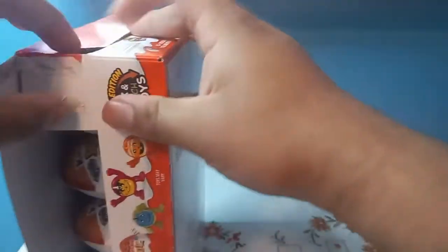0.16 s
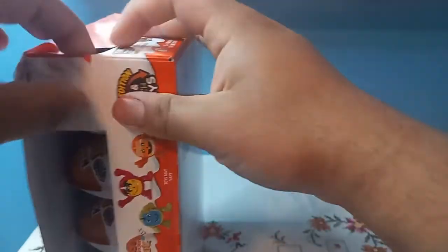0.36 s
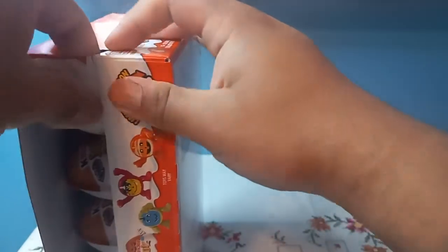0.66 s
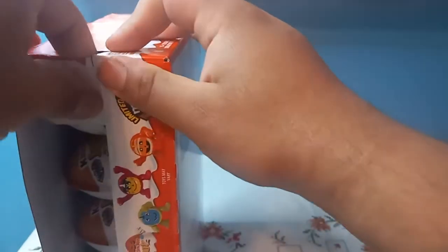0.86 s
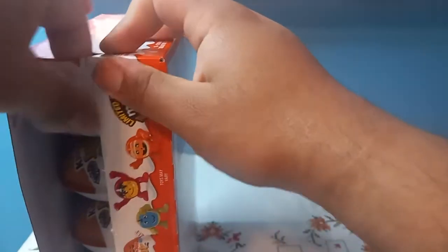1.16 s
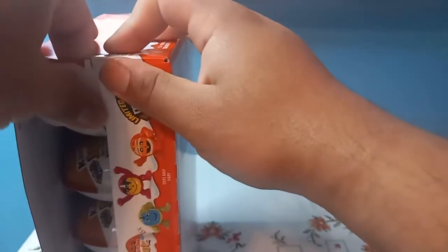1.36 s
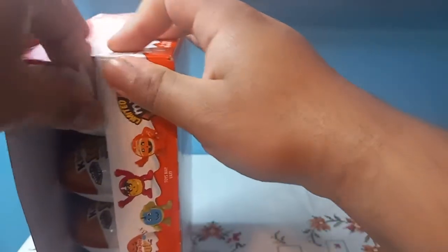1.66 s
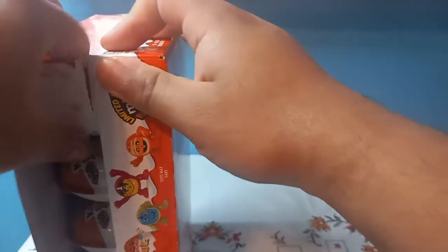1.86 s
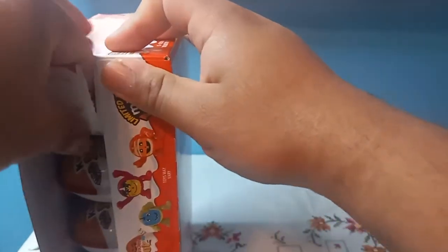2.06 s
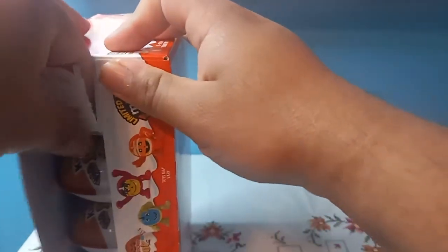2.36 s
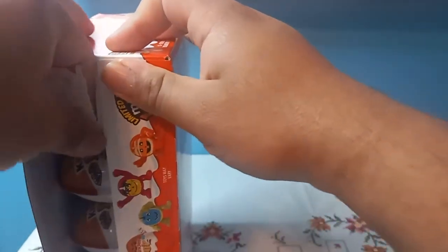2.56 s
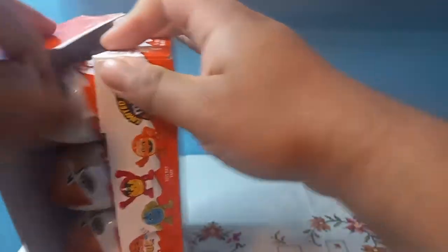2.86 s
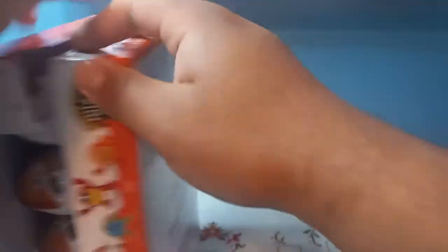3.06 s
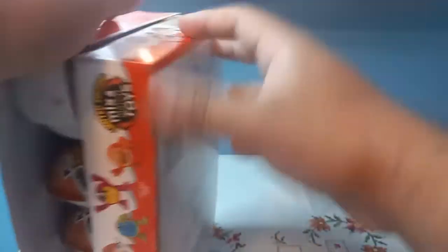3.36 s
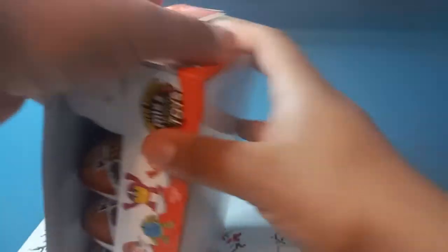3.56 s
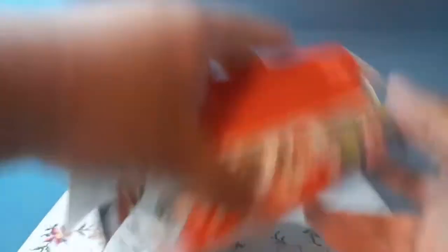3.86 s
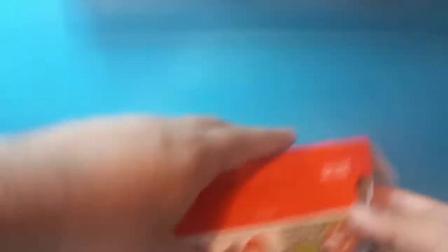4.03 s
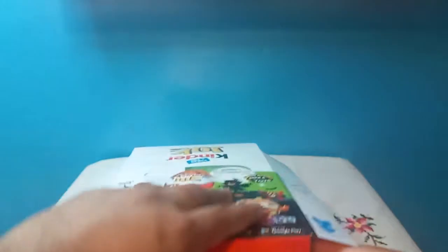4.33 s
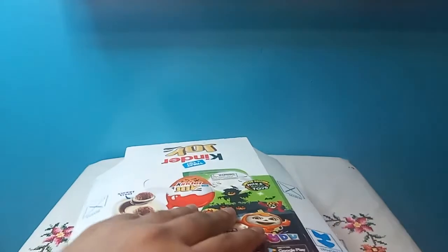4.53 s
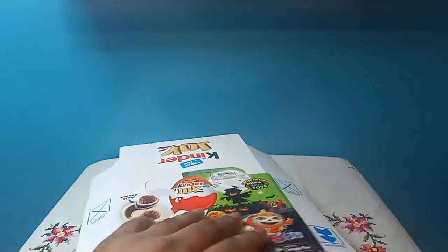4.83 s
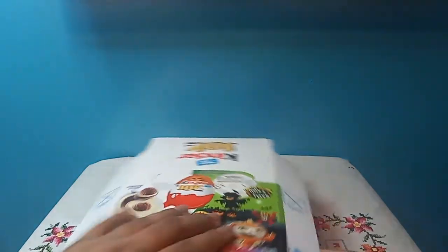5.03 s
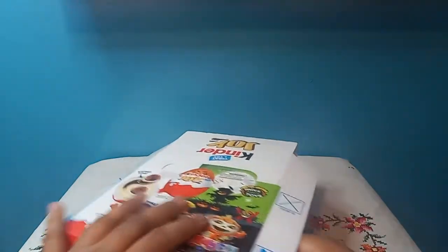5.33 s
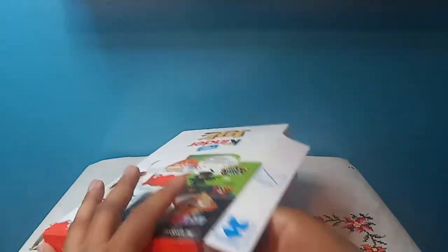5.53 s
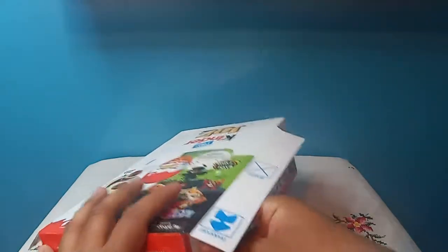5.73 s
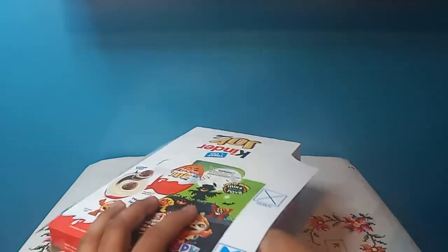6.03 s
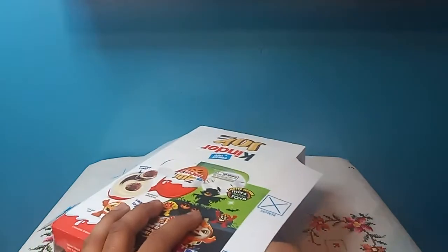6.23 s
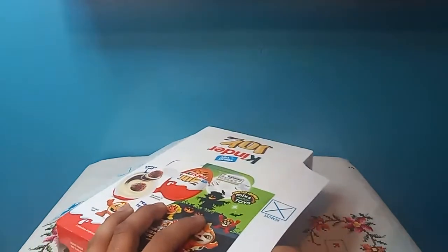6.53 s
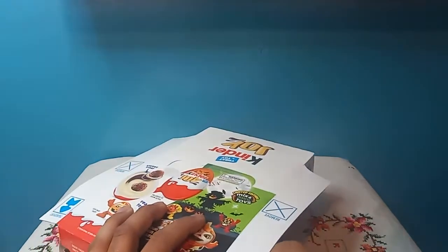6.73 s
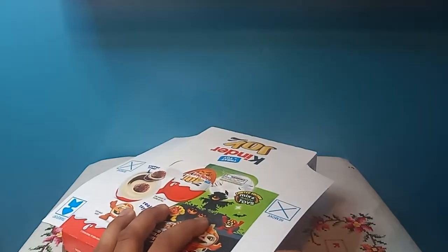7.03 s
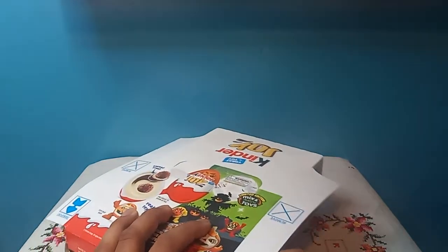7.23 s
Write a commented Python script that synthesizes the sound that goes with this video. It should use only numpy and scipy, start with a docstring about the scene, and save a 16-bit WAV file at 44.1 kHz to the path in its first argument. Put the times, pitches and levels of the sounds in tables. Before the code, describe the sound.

Dry cardboard rustling, sticky finger scrapes, bright glue ticks and boomy panel thumps as a small box is opened and flipped indoors.

```python
"""Opening a paperboard box by hand

Close to a phone in a small quiet room, hands pry open the flaps of a thin box, turn it over and press it
on a cloth-covered table. Sliding fingers slip and stick: uneven noise bursts ring the panels' damped modes.
Squeezed walls boom, flaps knock as decaying sines, and glue and fibres snap in millisecond bursts.
Rustle, squeaks and a faint rub lie around them; two ports hear the box, a short room tail and a hush."""
import sys
import numpy as np
from scipy import signal
from scipy.fft import rfft, irfft, next_fast_len
from scipy.io import wavfile
from scipy.ndimage import uniform_filter1d, map_coordinates

SR = 44100
rng = np.random.default_rng(int(sys.argv[2]) if len(sys.argv) > 2 else 0)


def wrap_up_sound(samples):
    """Save the sound to the file named by the first command line argument, as 16-bit audio."""
    columns = np.atleast_2d(samples).T
    # keep every value between -1 and 1, then stretch to whole-number steps
    tamed = np.clip(columns, -1, 1)
    steps = np.round(tamed * 32767).astype(np.int16)
    wavfile.write(sys.argv[1], SR, steps)


N = 325899

# All levels are those ahead of the overall tone.
# Shape of the quiet room's hush: freq_hz, relative_db
HUSH_COLOUR = [(30, -38), (75, -18), (820, 25), (5300, -30.5), (16000, -43)]
HUSH_DB = -78
ROOM_T60_S, ROOM_WET_DB = 0.16, -15

# Overall tone at the ports, with little left above 16 kHz: freq_hz, gain_db
OVERALL_TONE = [(30, -18.5), (70, -4), (200, -2.5), (4000, 13.5), (5300, 12.5), (7400, 12.5), (9700, 8.5),
                (15500, 16.5), (16100, -28.5)]
TOP_HZ = 16900
# The phone's body shades the left port against the right: freq_hz, left_minus_right_db
BODY_SHADE = [(60, 0), (250, -2.5), (900, 2), (2400, -5), (4400, -3.5), (8100, 1.5), (15000, -5.5)]
# The box stands on end, is turned over, then lies flat under the hand
TURN_S, TURN_LENGTH_S = 3.55, 0.18
# How far the left port leads the right, standing then lying: lead_ms
LEFT_LEAD = (0.266, 0.084)

# A faint rub near one pitch, swelling towards the end: time_s, level_db
RUB_LEVEL = [(6.2, -90.5), (6.4, -69), (7.02, -76.5), (7.31, -62.5), (7.36, -53), (7.39, -55)]
RUB_HZ = 1240

# Skin and loose paper brush the printed face: time_s, rustle_db (before the hand's load scales it)
BRUSH_LEVEL = [(0, -55.5), (.55, -54), (.85, -62.5), (1.13, -54.5), (1.27, -75.5), (1.42, -57),
               (2.3, -69.5), (2.76, -58), (3.25, -52), (3.7, -49), (4.0, -56), (4.75, -62.5), (5.0, -48),
               (5.25, -56), (6.0, -58), (6.5, -65), (6.8, -68.5), (7.39, -52.5)]
BUSY_DB, BRUSH_REST_DB = -52, -12.5  # load at which the rustle is half on; what is left between strokes
PATCHY_DB = 2.5  # rms swing of a hiss band

# An edge drags and sings briefly on one pitch: start_s, length_s, level_db, pitch_hz
EDGE_SQUEAKS = [(3.759, 0.041, -52, 2570), (3.89, 0.018, -40, 5670), (3.891, 0.023, -48, 4500)]
SQUEAK_T60_S = 0.014

# Bright, thin ticks: glue spots letting go, and at 1.511 s a faint bright tick just before
# the loud snap: start_s, peak_db
BRIGHT_TICKS = [(0.5685, -33.5), (1.383, -49.5), (1.476, -53), (1.511, -42.5), (1.543, -21.5), (1.988, -47),
                (2.077, -38.5), (2.114, -33.5), (2.1312, -28), (2.188, -28), (2.535, -43.5), (2.558, -36),
                (2.587, -33), (2.606, -28), (2.629, -26.5), (2.6367, -25), (3.948, -42), (6.251, -46),
                (7.2734, -51)]
# Folds and fibres cracking: start_s, peak_db (of the fold), pitch_hz, spit_db (bright, re fold peak)
FOLD_CRACKS = [(0.112, -29, 3900, -1), (0.142, -31.5, 2330, -7), (0.6089, -24, 1280, -16),
               (1.533, -32, 3700, 18), (1.87, -28.5, 1150, -28), (1.928, -31.5, 2260, -15),
               (2.3323, -26.5, 2080, -27), (2.6795, -38, 2350, -1), (2.7356, -12, 2920, -15.5),
               (2.9281, -36, 2720, -25), (3.127, -26, 2740, -15), (3.9305, -26.5, 2140, -17),
               (4.437, -25, 2070, -11.5), (4.564, -24, 2630, -14), (4.6529, -19.5, 2150, -12.5),
               (4.7164, -25, 2630, -21), (5.097, -28.5, 2760, -9), (5.7, -36, 2580, -22),
               (6.0279, -30.5, 2750, -3.5), (6.9261, -18.5, 5480, -16)]
# Short ring, then the longer one of wide folds from the turn on; spacing of a fold's resonances
CRACK_T60_S, CRACK_SPREAD_OCT = (0.005, 0.013), 0.36

# Modes of the paperboard walls: freq_hz, relative_db
BOARD_MODES = [(88, 11.5), (140, 8.5), (205, -1), (255, 1), (335, 3), (405, -3.5), (490, 0), (575, -2),
               (670, 5.5), (750, 2.5), (840, 7.5), (1050, 3.5), (1500, 8), (1850, 7.5), (2200, 0.5)]

# Flaps and walls knocking: start_s, peak_db, ring_centre_hz
FLAP_KNOCKS = [(0.163, -28, 312), (0.446, -31, 293), (0.609, -21.5, 322), (1.204, -26, 252),
               (1.536, -14.5, 255), (1.598, -28.5, 505), (1.713, -37, 420), (2.329, -22.5, 197),
               (2.638, -22, 850), (2.643, -12.5, 206), (2.733, -21, 155), (2.89, -16.5, 240),
               (2.927, -13.5, 230), (3.116, -19.5, 274), (3.349, -24, 230), (3.554, -37.5, 610),
               (3.872, -10.5, 237), (3.932, -9.5, 222), (4.036, -19.5, 151), (4.04, -26, 650),
               (4.44, -34, 745), (4.567, -29, 600), (4.651, -19.5, 556), (4.717, -24.5, 650),
               (5.097, -18.5, 556), (5.828, -26, 394), (6.025, -29, 680), (6.058, -26.5, 86.5)]
# An edge judders over the cloth, catching again and again: start_s
JUDDER_STARTS = [6.241, 6.261, 6.289, 6.315, 6.332, 6.349, 6.364]
JUDDER_DB, JUDDER_HZ, JUDDER_T60_S = -42, 700, 0.05
KNOCK_T60_S = 0.115  # lowest modes; higher ones die sooner

# Pitch the big walls favour as the grip on them changes: time_s, pitch_hz
WALL_PITCH_CURVE = [(0, 263), (3.9, 181), (4.06, 160), (4.4, 428), (5.6, 316), (5.8, 207)]
# How much of each stroke bends the walls: time_s, bend_db (re stroke)
SQUEEZE_CURVE = [(0, 10.5), (2.4, 15.5), (2.7, 3.5), (3.76, 17.5), (3.84, 25.5), (4.05, 29.5), (4.16, 9),
                 (4.5, -9), (5.3, -5.5), (5.7, 7), (7.39, 2)]
FLEX_ATTACK_S, FLEX_RELEASE_S, FLEX_REST_DB = 0.042, 0.054, -68
WALL_T60_S = 0.07

# Fingers and flap edges scrape the board: start_s, length_s, level_db, hiss_db (fibres, re stroke)
FINGER_STROKES = [(0.045, 0.039, -52.5, -9), (0.105, 0.038, -42, 0), (0.21, 0.022, -51, 6),
                  (0.415, 0.31, -55, -24), (0.537, 0.041, -44, 2), (0.582, 0.084, -44, -10),
                  (1.05, 0.088, -62, 2), (1.184, 0.038, -56.5, 0), (1.332, 0.028, -56.5, -7),
                  (1.521, 0.045, -32.5, -1.5), (1.596, 0.18, -57, 1.5), (1.818, 0.14, -55, 7),
                  (1.986, 0.031, -47, -20), (2.103, 0.11, -51.5, -2), (2.253, 0.13, -53.5, -1.5),
                  (2.603, 0.087, -41.5, 3), (2.68, 0.28, -49.5, -35.5), (2.876, 0.071, -29.5, -21),
                  (2.923, 0.035, -30, -13.5), (2.978, 0.13, -43.5, -11.5), (3.113, 0.058, -37, -12),
                  (3.185, 0.3, -53.5, -2.5), (3.696, 0.45, -56, -6.5), (3.825, 0.25, -48.5, -1.5),
                  (4.118, 0.3, -42.5, -12.5), (4.426, 0.067, -44.5, -1.5), (4.503, 0.097, -38, -9.5),
                  (4.623, 0.079, -42.5, -32), (4.694, 0.079, -39, -9.5), (4.846, 0.087, -35.5, -12),
                  (5.062, 0.19, -51.5, -1), (5.411, 0.19, -54, -1), (5.671, 0.041, -47.5, -10),
                  (5.768, 0.15, -40.5, -9), (5.921, 0.042, -42.5, -19), (6.015, 0.034, -35, -9),
                  (6.1, 0.046, -44, -8), (6.227, 0.11, -51.5, -16), (6.61, 0.15, -52, -1),
                  (6.778, .2, -54, -1.5), (7.325, 0.099, -58, 1.5)]
GRIP_ATTACK_S, GRIP_RELEASE_S = 0.007, 0.014
GRIP_SAG = 0.6  # natural-log fall over one stroke length
FIRM_DB, FIRM_HZ, LIGHT_OCT_PER_DB = -50.5, 620, 0.2  # a lighter touch rings higher modes
TOUCH_WANDER_DB = 3.2
SCRAPE_T60_S = 0.02  # at 600 Hz


def undb(db):
    """dB to gain."""
    return 10 ** (np.asarray(db) / 20)


def unit(x):
    """Scale to rms 1."""
    return x / np.sqrt(np.mean(x ** 2))


def colour(x, table):
    """Filter by points of freq_hz, gain_db, joined along log frequency."""
    hz, db = np.transpose(table)
    size = next_fast_len(x.shape[-1])
    f = np.maximum(np.fft.rfftfreq(size, 1 / SR), 1)
    gain = undb(np.interp(np.log(f), np.log(hz), db))
    return irfft(rfft(x, size) * gain, size)[..., :x.shape[-1]]


def ring(x, hz, t60):
    """One damped mode, a two-pole resonance driven by x."""
    pole = np.exp(2j * np.pi * hz / SR - np.log(1000) / (t60 * SR))
    return signal.lfilter([pole.imag], [1, -2 * pole.real, abs(pole) ** 2], x)


def near(hz, centre_hz, octaves):
    """How strongly a mode answers a contact that favours one pitch."""
    return 1 / (1 + (np.log2(hz / centre_hz) / octaves) ** 2) ** 2


def add(out, x, s, gains):
    """Mix an event in at s seconds."""
    i = int(s * SR)
    out[:, i:i + len(x)] += np.outer(gains, x)[:, :N - i]


def slips(per_s, spread_db, burst_ms, steady, channels=1):
    """Stick-slip: random uneven releases, each a short burst over steady sliding; slow rms near 1."""
    when, size = rng.random(N), rng.exponential(size=N)
    noise = rng.standard_normal((channels, N))
    kicks = (when < per_s / SR) * undb(spread_db * np.minimum(size, 2.4))
    force = signal.lfilter([1], [1, -np.exp(-1000 / (burst_ms * SR))], kicks) + steady
    return noise * force / np.sqrt(uniform_filter1d(force ** 2, int(0.07 * SR)))


def patchy(x):
    """Bands of a hiss brighten and dull by turns as the sliding face changes its angle."""
    _, _, z = signal.stft(x, nperseg=512)
    field = rng.standard_normal(z.shape[1:])
    for axis in (0, 1):
        field = uniform_filter1d(field, size=9, axis=axis)
    z = z * undb(PATCHY_DB * unit(field))
    return unit(signal.istft(z, nperseg=512)[1][:, :N])


def grip(t, length, attack, release):
    """A hand takes hold, sags along the stroke, lets go."""
    hold = 1 - np.exp(-t / attack)
    return hold * np.exp(-GRIP_SAG * t / length - np.maximum(t - length, 0) / release)


def hand_load(t):
    """Every stroke loads the box, which settles more slowly than the fingers let go."""
    coarse = t[::SR // 1000]  # about 1 ms steps
    power = 0
    for s, length, db, _ in FINGER_STROKES:
        since = np.maximum(coarse - s, 0)
        power = power + (undb(db) * grip(since, length, FLEX_ATTACK_S, FLEX_RELEASE_S)) ** 2
    return np.interp(t, coarse, np.sqrt(power))


def hush():
    """Steady coloured noise of the quiet room, partly shared by the two ports."""
    mid, side = rng.standard_normal((2, N))
    noise = colour(mid + 0.5 * np.array([side, -side]), HUSH_COLOUR)
    return undb(HUSH_DB) * unit(noise)


def room(x):
    """Table top and near walls: a short diffuse tail, different at each port."""
    t = np.arange(int(0.3 * SR)) / SR
    fall = np.exp(-np.log(1000) * t / ROOM_T60_S) * (t > 0.002)
    tail = rng.standard_normal((2, len(t))) * fall
    tail = colour(tail, [(150, -10.0), (1000, -2.0), (8000, -10.0)])
    tail /= np.sqrt((tail ** 2).sum(1, keepdims=True))
    return undb(ROOM_WET_DB) * signal.fftconvolve(x, tail, axes=1)[:, :N]


def faint_rub(rub_db):
    """Light sliding that rings only the few modes around its pitch."""
    force = slips(170, 7.2, 8.5, 0.39)
    modes = sum(near(hz, RUB_HZ, 0.1) * ring(force, hz, SCRAPE_T60_S / 2) for hz, _ in BOARD_MODES[8:14])
    return undb(rub_db) * unit(modes)


def rustle(level):
    """Brushing hiss comes off a whole face, so the two ports share very little of it."""
    common, left, right = slips(300, 2.4, 1.0, 1.0, channels=3)
    hiss = common + 16.0 * np.array([left, right])
    return level * patchy(colour(hiss, [(2000, 6.0), (5000, -7.0), (16000, -7.5)]))


def squeaks():
    """Fine sliding that rings one narrow resonance, swelling and fading."""
    out = np.zeros((1, N))
    noises = rng.standard_normal((len(EDGE_SQUEAKS), SR // 10))
    for (s, length, level_db, hz), noise in zip(EDGE_SQUEAKS, noises):
        x = unit(ring(noise, hz, SQUEAK_T60_S))[:int(length * SR)]
        add(out, x * np.sqrt(np.hanning(len(x))), s, [undb(level_db)])
    return out


def breaks(count):
    """Each break: a burst a millisecond or two long, then half-millisecond crumbs; spit, push, chance."""
    size = int(0.06 * SR)
    t = np.arange(size) / SR
    spit_noise, push_noise, chance = rng.standard_normal((count, 3, size)).transpose(1, 0, 2)
    crumb_db = 4 * np.repeat(chance, int(SR / 2000), axis=1)[:, :size]
    crumbs = undb(crumb_db) * np.exp(-t / 0.012)
    burst = (1 - np.exp(-t / 0.0003)) * np.exp(-t / 0.0014)
    treble = signal.butter(2, 2900, "high", fs=SR, output="sos")
    spit = signal.sosfilt(treble, spit_noise * (burst + 0.075 * crumbs))
    spit /= np.abs(spit).max(1, keepdims=True)
    push = (t == 0) + push_noise * (0.06 * burst + 0.006 * crumbs)  # a click, then rough noise
    return spit, push, chance


def snaps():
    """Ticks only spit; a crack also rings five short resonances of the fold around its pitch."""
    out = np.zeros((1, N))
    for (s, peak_db), spit in zip(BRIGHT_TICKS, breaks(len(BRIGHT_TICKS))[0]):
        add(out, spit, s, [undb(peak_db)])
    for (s, peak_db, hz, spit_db), spit, push, chance in zip(FOLD_CRACKS, *breaks(len(FOLD_CRACKS))):
        t60 = CRACK_T60_S[int(s > TURN_S and hz < 4000)]
        fold = 0
        for k, detune in zip(range(-2, 3), chance[::-1]):
            mode_hz = hz * 2 ** (CRACK_SPREAD_OCT * (k + 0.15 * detune))
            fold = fold + ring(push, mode_hz, t60) / (1 + k * k)
        add(out, fold / np.abs(fold).max() + undb(spit_db) * spit, s, [undb(peak_db)])
    return out


def knocks():
    """A soft push rings the wall modes around the knock's pitch; each blow meets them differently."""
    out = np.zeros((1, N))
    mode_hz, mode_db = np.array(BOARD_MODES).T[:, :, None]
    t = np.arange(int(0.25 * SR)) / SR
    blows = [(*knock, KNOCK_T60_S) for knock in FLAP_KNOCKS]
    blows += [(s, JUDDER_DB, JUDDER_HZ, JUDDER_T60_S) for s in JUDDER_STARTS]
    chance = rng.standard_normal((len(blows), 3, len(BOARD_MODES), 1))
    for (s, peak_db, hz, t60), (bend, gain, phase) in zip(blows, chance):
        f = mode_hz * (1 + 0.029 * bend)
        weight = undb(mode_db + 3 * gain) * near(f, hz, 0.95)
        mode_t60 = t60 / (1 + (f / 650) ** 1.4)  # higher modes die sooner
        fall = np.exp(-np.log(1000) * t / mode_t60)
        modes = weight * fall * np.sin(2 * np.pi * f * t + 1.06 * phase)
        soft_onset = 1 - np.exp(-t * hz * 2.0)
        x = modes.sum(0) * soft_onset
        add(out, x / np.abs(x).max(), s, [undb(peak_db)])
    return out


def walls(flex, wall_hz):
    """Squeezed walls buckle in slow jerks and boom; the deepest thud comes through the table."""
    force = slips(100, 0.72, 1.2, 0.71)
    boom = 0
    for hz, db in BOARD_MODES:
        if hz < 450:
            boom = boom + undb(db) * near(hz, wall_hz, 0.71) * ring(force, hz, WALL_T60_S)
    boom /= np.sqrt(uniform_filter1d(boom ** 2, int(0.5 * SR)))
    # the thud is unlike at each port
    thud = colour(rng.standard_normal((2, N)), [(35, -33.5), (75, 6.5), (130, -61.0)])
    return flex * (boom + undb(-4.5) * near(56, wall_hz, 2.5) * unit(thud))


def strokes():
    """Each stroke grips fast, stutters along and lets go; it rings modes near its pitch and tears fibres."""
    out = np.zeros((2, N))
    force, left, right = slips(220, 5.46, 3.1, 0.92, channels=3)
    hiss = force + 19.0 * np.array([left, right])
    fibres = patchy(colour(hiss, [(700, 24.0), (2400, 21.9), (4500, 8.9), (16000, 0.96)]))
    chance = rng.standard_normal((len(FINGER_STROKES), len(BOARD_MODES), 16))
    for (s, length, level_db, hiss_db), draws in zip(FINGER_STROKES, chance):
        i = int(s * SR)
        t = np.arange(int((length + 0.08) * SR))[:N - i] / SR
        span = slice(i, i + len(t))
        centre_hz = FIRM_HZ * 2 ** (LIGHT_OCT_PER_DB * (FIRM_DB - level_db))
        body = 0
        for (hz, db), (bend, *wander) in zip(BOARD_MODES[4:], draws):
            # the moving contact meets each mode now strongly, now weakly; high modes are short
            drift = np.interp(t / 0.021, np.arange(len(wander)), wander)
            touch = undb(db / 2 + TOUCH_WANDER_DB * drift)
            t60 = SCRAPE_T60_S * np.sqrt(600 / hz)
            mode = ring(force[span] * touch, hz * (1 + 0.071 * bend), t60)
            body = body + (0.0081 + near(hz, centre_hz, 1.0)) * mode
        hold = undb(level_db) * grip(t, length, GRIP_ATTACK_S, GRIP_RELEASE_S)
        out[:, span] += hold * (unit(body) + undb(hiss_db) * fibres[:, span])
    return out


def at_ports(box, t):
    """Treble reaches the right port later, big-wall bass reaches both together; the body shades the left."""
    bass = colour(box[1], [(700, -5.5), (2500, -16.0)])
    lead_ms = np.interp(t, [TURN_S, TURN_S + TURN_LENGTH_S], LEFT_LEAD)
    late = np.arange(N) - lead_ms * SR / 1000
    right = bass + map_coordinates(box[1] - bass, [late], order=3)
    return np.array([colour(box[0], BODY_SHADE), right])


def scene():
    """The box at two ports, its room and the hush."""
    t = np.arange(N) / SR

    def curve(table):
        """Straight lines between a table's points."""
        return np.interp(t, *np.transpose(table))

    load = hand_load(t)
    flex = load * undb(curve(SQUEEZE_CURVE)) + undb(FLEX_REST_DB)
    busy = load / (load + undb(BUSY_DB)) + undb(BRUSH_REST_DB)
    box = faint_rub(curve(RUB_LEVEL)) + rustle(undb(curve(BRUSH_LEVEL)) * busy)
    box = box + squeaks() + snaps() + knocks()
    box = box + walls(flex, curve(WALL_PITCH_CURVE)) + strokes()
    return at_ports(box, t) + room(box) + hush()


def record(dry):
    """Overall tone, with little left above 16 kHz, then a steep cut of the top."""
    top_cut = signal.ellip(8, 0.2, 70, TOP_HZ, fs=SR, output="sos")
    return signal.sosfilt(top_cut, colour(dry, OVERALL_TONE))


dry = scene()
out = record(dry)
wrap_up_sound(out)
```